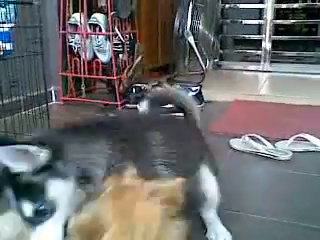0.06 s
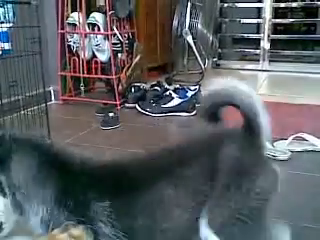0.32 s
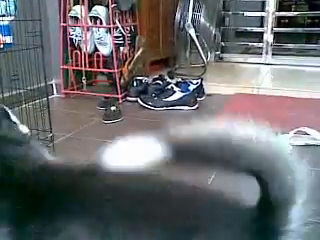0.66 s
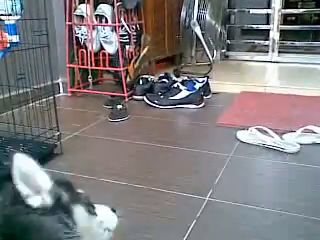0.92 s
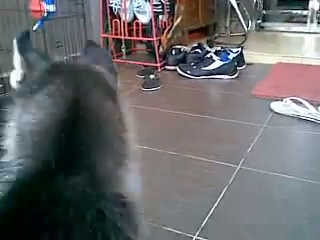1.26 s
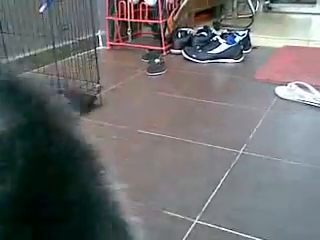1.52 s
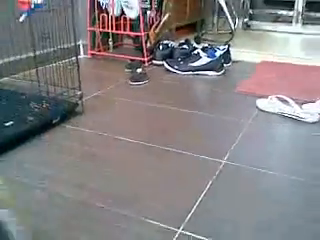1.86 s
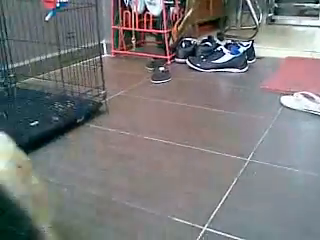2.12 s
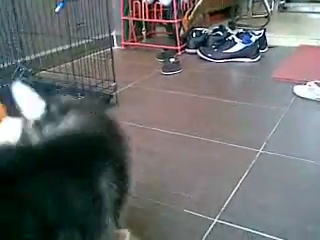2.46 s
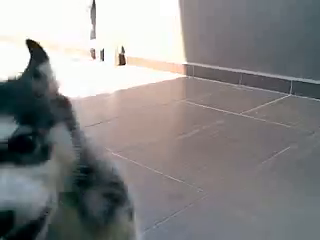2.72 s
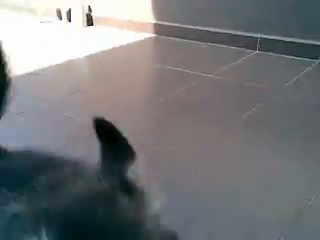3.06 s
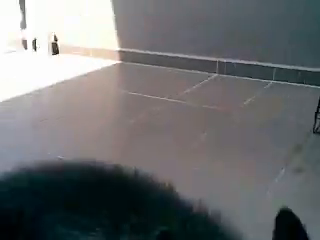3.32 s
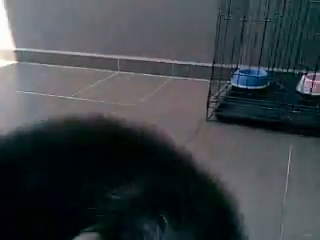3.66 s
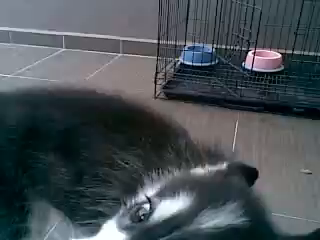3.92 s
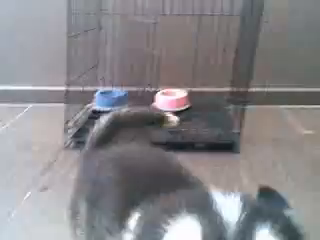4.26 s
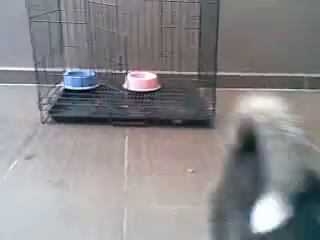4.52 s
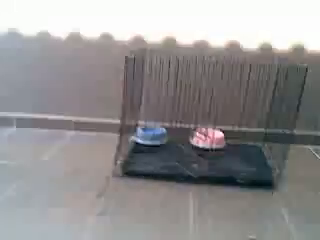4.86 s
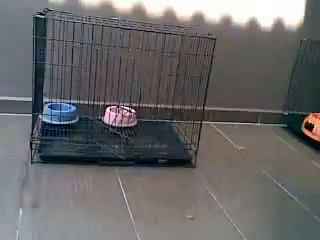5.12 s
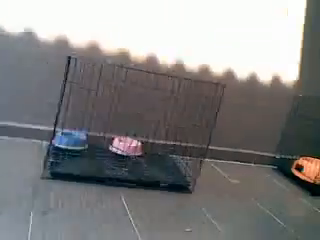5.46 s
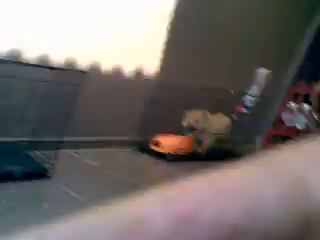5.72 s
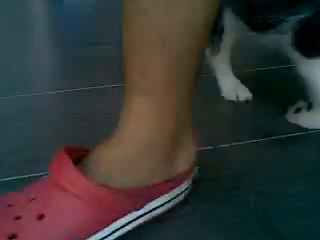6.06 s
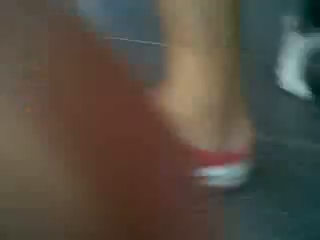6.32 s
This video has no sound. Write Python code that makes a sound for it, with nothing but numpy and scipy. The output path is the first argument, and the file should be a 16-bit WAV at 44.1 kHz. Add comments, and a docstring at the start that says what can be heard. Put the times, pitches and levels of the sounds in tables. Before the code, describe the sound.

Puppies rub, scrape and bump against the microphone, with sharp claw ticks over a faint, distant engine hum.

```python
"""Puppies against the camera

Puppies scuffle on a porch's tile floor, right against a hand-held camera: fur rubs and scrapes over
the case, noses and paws bump it, claws tick, and one pup sniffs and faintly whines. Near the middle
the sound drops out briefly and returns with a thin metallic ring. From there a far engine hums and
slowly speeds up over the low noise of the porch."""
import sys
import numpy as np
from scipy import signal
from scipy.fft import rfft, irfft, next_fast_len
from scipy.io import wavfile
from scipy.ndimage import uniform_filter1d, map_coordinates

SR = 44100
rng = np.random.default_rng(int(sys.argv[2]) if len(sys.argv) > 2 else 0)


def waveform_to_disk(signal):
    """Save audio, clipped to [-1, 1], as 16-bit WAV at the path in sys.argv[1]."""
    frames = np.transpose(np.atleast_2d(signal))
    scaled = np.clip(frames, -1, 1) * 32767
    samples = np.round(scaled).astype(np.int16)
    wavfile.write(sys.argv[1], SR, samples)


N = 282221
TIME = np.arange(N) / SR


def amp(db):
    """Decibels to gain."""
    return 10 ** (np.asarray(db) / 20)


def unit(x):
    """x at rms 1."""
    return x / np.sqrt(np.mean(x ** 2) + 1e-20)


def curves(rows):
    """One value per sample for each column after the time."""
    times, *columns = np.transpose(rows)
    return [np.interp(TIME, times, column) for column in columns]


def wobble(rate):
    """A smooth random curve, rate knots a second."""
    return map_coordinates(rng.standard_normal(int(N * rate / SR) + 4), [TIME * rate])


def filtered(x, response):
    """x through a complex frequency response."""
    size = next_fast_len(len(x) + 8192)
    return irfft(rfft(x, size) * response(np.fft.rfftfreq(size, 1 / SR)), size)[:len(x)]


def coloured(x, points):
    """x shaped by (Hz, dB) points joined on a log axis."""
    hz, db = np.transpose(points)
    return filtered(x, lambda f: amp(np.interp(np.log(f + 1), np.log(hz + 1), db)))


def resonance(f, centre, width):
    """Response of one damped mode."""
    return 1j * f * width / (centre ** 2 - f ** 2 + 1j * f * width)


def band(x, centre, width):
    """x passed twice through one damped mode."""
    return filtered(x, lambda f: resonance(f, centre, width) ** 2)


def add(track, s, x):
    """Mix x into the track from time s on."""
    start = max(round(s * SR), 0)
    track[start:start + len(x)] += x[:max(N - start, 0)]


def stroke(t, half):
    """Strength of a stroke that swells and fades around t = 0."""
    return 1 / np.cosh(np.clip(t / half, -20, 20)) ** 2


# The open air on the porch. Each row: frequency in Hz, spectral density in dB.
PORCH_SPECTRUM = [(10, -30), (25, -9), (40, -2), (62, 0), (100, -5), (150, -3), (250, -11), (400, -13),
                  (800, -18), (1600, -28.5), (2200, -29), (3200, -34.5), (6300, -40.5), (9500, -48),
                  (10400, -62)]
# Its rise and fall. Each row: time in seconds, level in dB.
PORCH_LOUDNESS = [(0, -43.5), (1.5, -43.5), (2.0, -47), (2.55, -46.5), (2.7, -43.5), (3.9, -46), (4.6, -40),
                  (5.4, -40.5), (5.9, -46.5)]


def porch():
    """Low outdoor noise all around the microphone, drifting a little."""
    level_db, = curves(PORCH_LOUDNESS)
    air = unit(coloured(rng.standard_normal(N), PORCH_SPECTRUM))
    return amp(level_db + 0.44 * wobble(5.5)) * air


def friction(rate, spread_db, smooth):
    """Hairs catch and slip: tiny impulses of uneven size, rate a second, on an even hiss."""
    slips = (rng.random(N) < rate / SR) * rng.choice([-1, 1], N)
    sizes = amp(spread_db * np.minimum(rng.standard_normal(N), 2))
    return unit(unit(slips * sizes) + smooth * rng.standard_normal(N))


def patchy(x, depth_db=2.5):
    """As the contact wanders, resonances come and go: patches a few hundred Hz wide, some 20 ms long."""
    spectra = signal.stft(x, nperseg=512)[2]
    patches = uniform_filter1d(rng.standard_normal(spectra.shape), size=5, axis=0)
    patches = uniform_filter1d(patches, size=4, axis=1)
    return unit(signal.istft(spectra * amp(depth_db * unit(patches)), nperseg=512)[1][:N])


def snags(count=420, centre_hz=1700, life_s=0.002):
    """Tufts snag and let go: tiny separate scrapes, each with its own pitch and size."""
    out, t = np.zeros(N), np.arange(SR // 64) / SR
    for s in rng.uniform(0, N / SR, count):
        hz = centre_hz * np.exp(0.55 * rng.standard_normal())
        burst = rng.standard_normal(len(t)) * t * np.exp(-t / life_s)
        add(out, s, amp(rng.uniform(-3, 3)) * unit(band(burst, hz, hz / 2)))
    return unit(out)


# Rubbing on the case: low rumble and hiss, with two narrow treble gaps that are not the fur's.
# Each row: frequency in Hz, spectral density in dB.
RUMBLE_SPECTRUM = [(120, 3), (220, 4.5), (380, 7.5), (560, 1.5), (900, 2), (1300, -4), (1800, -16.5),
                   (3000, -31), (5000, -115)]
HISS_SPECTRUM = [(900, 5.5), (1600, 5), (3400, 1), (4500, 2), (5500, -6), (6700, -1.5), (7400, -23),
                 (8400, -11.5), (9500, -14.5), (10500, -63.5)]
# A coat drags slowly past, right at the microphone.
# Each row: middle in seconds, pressure in dB, half length in seconds, hiss in dB.
COAT_DRAGS = [(0.18, -50, 0.21, -59), (0.457, -48, 0.11, -58), (1.1, -46, 0.11, -62),
              (1.39, -42, 0.042, -49.5), (1.503, -73, 0.077, -45), (2.168, -50.5, .08, -63.5),
              (2.73, -46, 0.049, -51), (2.894, -51.5, 0.072, -49), (3.366, -46.5, 0.18, -61.5),
              (3.614, -44.5, 0.083, -57.5), (3.827, -40, 0.08, -49), (3.937, -38, 0.058, -45),
              (4.069, -37.5, 0.058, -46.5), (4.208, -39, 0.058, -40.5), (4.518, -44, 0.12, -58),
              (4.62, -67, 0.016, -45.5), (4.77, -38, 0.039, -45.5), (4.986, -55, 0.031, -39),
              (5.128, -38.5, 0.032, -40.5), (5.543, -60, 0.042, -40.5), (5.908, -48.5, 0.18, -80),
              (6.218, -55.5, 0.11, -49)]


def rubbing(body_uneven_db=1.6, hiss_uneven_db=0.4, snag_db=-5):
    """Coats drag on the case: coarse slips rumble, fine ones hiss, under one grip; snags crackle."""
    grip = wobble(70)
    coarse = patchy(friction(rate=600, spread_db=3, smooth=0.7))
    fine = patchy(friction(rate=1000, spread_db=3, smooth=0.7))
    body = amp(body_uneven_db * grip) * unit(coloured(coarse, RUMBLE_SPECTRUM))
    hiss = amp(hiss_uneven_db * grip) * unit(coloured(fine, HISS_SPECTRUM))
    pressure, slide = np.zeros(N), np.zeros(N)
    for s, pressure_db, half, hiss_db in COAT_DRAGS:
        swell = stroke(TIME - s, half)
        pressure += amp(pressure_db) * swell
        slide += amp(hiss_db) * swell
    return pressure * body + slide * (hiss + amp(snag_db) * snags())


# Noses and paws bump the case that holds the microphone.
# Each row: start in seconds, peak in dB, contact time in ms, ring of the struck spot in Hz.
CASE_BUMPS = [(0.022, -26.5, 0.72, 710), (0.04, -28.5, 0.8, 650), (0.057, -30.5, 0.74, 800),
              (0.137, -28.5, 0.94, 800), (0.171, -29.5, 1.4, 850), (0.386, -29.5, 0.55, 750),
              (0.836, -33, 0.24, 700), (1.0405, -29, 0.7, 845), (1.188, -28, 0.88, 810),
              (1.2004, -23, 0.85, 680), (1.2159, -17, 0.73, 696), (1.2305, -26, 0.5, 650),
              (1.26, -20.5, 0.69, 687), (1.3367, -27, 0.59, 930), (1.3686, -23, 1.1, 800),
              (1.397, -25, 0.55, 850), (1.405, -26, 0.54, 950), (1.448, -26.5, 0.61, 754),
              (1.7016, -19.5, 0.6, 330), (1.706, -12, 2.2, 130), (1.7252, -7, 0.37, 706),
              (1.7268, -5, 1.16, 380), (1.8838, -2, 1.03, 350), (2.765, -28.5, 0.99, 750),
              (3.928, -24, 0.53, 850), (4.537, -18, 0.52, 660), (4.687, -26, 0.34, 710),
              (5.037, -22.5, 0.68, 610), (5.1826, -7.5, 0.61, 750), (5.1838, -11, 2.2, 130),
              (5.2676, -17, 0.45, 795), (5.308, -12.5, 1, 500), (5.4164, -6, 0.87, 410),
              (5.434, -4, 1.08, 281), (5.4368, -10.5, 1.22, 750), (5.5386, -10.5, 0.27, 1180),
              (5.808, -15, 0.41, 776), (5.913, -26, 0.56, 700), (6.2565, -18, 1.84, 260)]


def knocks(grit=0.021, leak_hz=70, panel_hz=910, shell_hz=2700):
    """One short push a bump: the struck spot is heavily damped; panel and shell ring a few cycles."""
    def case(f, spot_hz):
        push = 0.38 * 1j * f / (leak_hz + 1j * f)
        modes = resonance(f, panel_hz, width=230) + resonance(f, shell_hz, width=450)
        return push + resonance(f, spot_hz, width=560) + amp(-4) * modes

    out, ms = np.zeros(N), np.arange(SR // 16) * 1000 / SR
    for s, db, contact_ms, hz in CASE_BUMPS:
        force = np.sin(np.pi * np.minimum(ms / contact_ms, 1)) ** 2
        force *= 1 + grit * rng.standard_normal(len(ms))  # rough surfaces crunch as they meet
        bump = filtered(force, lambda f: case(f, hz))
        add(out, s, amp(db) * bump / np.abs(bump).max())
    return out


def walls(x, t60=0.074, dull_hz=4000):
    """A short, duller answer from the tiles and walls around the camera."""
    t = np.arange(SR // 2) / SR
    tail = rng.standard_normal(len(t)) * amp(-60 * t / t60)
    reflected = signal.fftconvolve(x, tail / np.linalg.norm(tail))[:N]
    return filtered(reflected, lambda f: 1 / (1 + 1j * f / dull_hz))


def rasp(rate=330, depth_db=6):
    """Stick and slip: the grip lets go at an uneven rate, and each slip dies away until the next."""
    cycle = np.cumsum(rate * amp(3 * wobble(250))) / SR % 1
    return unit(amp(-depth_db * cycle))


# A nose close to the microphone. Each row: middle in seconds, level in dB, half length in seconds.
CLOSE_SNIFFS = [(0.283, -47.5, 0.062), (1.229, -44.5, 0.03), (1.294, -55, 0.0397)]
# Its whistles. Each row: pitch in Hz, relative level in dB.
NOSTRIL_WHISTLES = [(3300, 1), (4000, -5)]


def sniffs(flutter=0.033, drift=0.018, sag=0.06):
    """A puppy draws air through narrow nostrils that half whistle, sagging in pitch as the flow ends."""
    flow = sum(amp(db) * stroke(TIME - s, half) for s, db, half in CLOSE_SNIFFS)
    hiss = unit(band(rng.standard_normal(N), centre=3350, width=1200))
    bend = 1 + drift * wobble(35) - sag * (1 - flow / flow.max()) ** 4
    whistle = np.zeros(N)
    for hz, db in NOSTRIL_WHISTLES:
        pitch = hz * bend * (1 + flutter * wobble(500))
        whistle += amp(db + 3.3 * wobble(110)) * np.sin(2 * np.pi * np.cumsum(pitch) / SR)
    return unit((hiss + unit(whistle)) * rasp()) * flow


# Gritty scraping noise, duller toward the top, with a narrow treble gap that is not the scrape's.
# Each row: frequency in Hz, spectral density in dB.
GRIT_SPECTRUM = [(100, 23.5), (400, 21), (800, 16.5), (1400, 11), (2500, 8), (4000, 4.5), (5500, 3),
                 (6800, 3), (7700, -9), (9000, -4), (10200, -42.5)]
# Quick scrapes over the case, at the microphone. Each row: peak time in seconds, level in dB,
# rise and fall in seconds, brightest band in Hz, linear gain of the ring there.
CASE_SCRAPES = [(0.374, -45, 0.008, 0.016, 1500, 0), (0.51, -45, 0.036, 0.023, 1990, 0.5),
                (0.996, -47, 0.019, .02, 1620, .5), (1.192, -45.5, 0.024, 0.0073, 2600, 8),
                (1.203, -34.5, 0.025, 0.015, 750, 4), (1.378, -39.5, 0.013, 0.043, 1900, -1),
                (1.476, -47, 0.01, 0.011, 1140, 9), (1.57, -46, 0.025, 0.016, 1560, -0.5),
                (1.724, -23.5, 0.0028, 0.0029, 3300, 0.5), (1.926, -50, 0.011, 0.01, 6700, 1.5),
                (2.029, -45, 0.0065, 0.054, 1850, 3.5), (2.29, -62, 0.15, 0.12, 2110, 9),
                (2.552, -55, 0.027, 0.025, 3560, -0.5), (2.95, -49.5, 0.017, .024, 1810, 0.5),
                (3.162, -47.5, 0.026, 0.017, 1600, -0.5), (3.22, -49.5, 0.014, 0.013, 2100, 0),
                (3.29, -48.5, 0.018, 0.053, 2400, 0), (3.438, -40, 0.038, 0.026, 1280, 0),
                (3.645, -51, 0.053, 0.051, 3030, 12), (3.93, -43.5, 0.1, 0.052, 2920, 10),
                (4.29, -38.5, 0.028, 0.015, 1500, 0.5), (4.366, -31, 0.0043, 0.025, 3020, 1.5),
                (4.711, -35.5, 0.012, 0.021, 4550, 0), (4.83, -37, 0.032, 0.037, 2570, 5),
                (4.829, -26, 0.019, 0.018, 6160, 1), (4.924, -30, 0.013, 0.0089, 3640, 0),
                (5.064, -28.5, 0.016, 0.036, 4700, 0), (5.196, -30, 0.022, 0.031, 1080, 2),
                (5.21, -36, 0.028, 0.02, 2360, 13), (5.324, -17, 0.018, 0.016, 2930, 2.9),
                (5.335, -24, 0.024, 0.022, 6460, 12), (5.427, -27, 0.025, 0.02, 1040, 1.3),
                (5.448, -37.5, 0.043, 0.047, 6600, -0.1), (5.659, -41, 0.052, 0.048, 4830, -0.5),
                (5.863, -42.5, 0.02, 0.02, 3970, 0), (5.944, -46, 0.02, 0.018, 2760, 0.2),
                (6.372, -39, 0.021, 0.026, 2600, -0.4)]


def scrapes(breadth=1.64, ring_breadth=0.28, ragged_db=1.92, edge=1.8, skirt=0.095):
    """Juddering strokes bite and let go; each scrape has its own bright band, which may ring."""
    out = np.zeros(N)
    slips = friction(rate=4000, spread_db=1.0, smooth=0.49) * rasp() * amp(ragged_db * wobble(230))
    grit = coloured(patchy(slips), GRIT_SPECTRUM)
    for s, db, rise, fall, hz, ring in CASE_SCRAPES:
        near = slice(max(round((s - 0.3) * SR), 0), round((s + 0.4) * SR))
        t = TIME[near] - s
        half = np.where(t < 0, rise, fall)
        bite = (1 - skirt) * np.exp(-np.abs(t / half) ** edge) + skirt * stroke(t, 2 * half)
        response = lambda f: resonance(f, hz, breadth * hz) + ring * resonance(f, hz, ring_breadth * hz)
        scrape = unit(bite * filtered(grit[near], response))
        out[near] += amp(db) * np.sqrt(np.mean(bite ** 2)) * scrape
    return out


# Claws at close range. Each row: start in seconds, peak in dB, ring in Hz.
CLAW_TICKS = [(0.386, -29, 7300), (0.422, -28, 7250), (0.836, -33.5, 2430), (1.218, -33, 1870),
              (1.259, -35, 2520), (1.336, -37, 2400), (1.37, -38, 3200), (1.397, -35, 2600),
              (1.7215, -6.5, 5950), (1.7503, -26, 2900), (1.884, -28, 2700), (2.714, -32.5, 6260),
              (4.363, -23, 7250), (4.3747, -22, 2500), (4.536, -25, 4340), (4.686, -32, 2970),
              (4.914, -38, 3460), (5.267, -24.5, 3960), (5.308, -10, 5000), (5.317, -9.5, 3200),
              (5.416, -19.5, 4200), (5.538, -15.5, 4160), (5.807, -23, 3770)]


def claws(cycles=26, breadth=0.59, tail_db=-24.5, tail_t60=0.011):
    """A hard claw makes a bright crack, gone in a few milliseconds; the higher its pitch, the sooner."""
    out, t = np.zeros(N), np.arange(SR // 25) / SR
    for s, db, hz in CLAW_TICKS:
        decay = amp(-60 * t * hz / cycles) + amp(tail_db - 60 * t / tail_t60)
        tick = band(rng.standard_normal(len(t)) * decay, hz, breadth * hz)
        add(out, s, amp(db) * tick / np.abs(tick).max())
    return out


# One faint whine beside the camera. Each row: time in seconds, pitch in Hz, level in dB.
WHINE_CONTOUR = [(1.24, 934, -76), (1.28, 938, -52), (1.325, 984, -47), (1.36, 1063, -55),
                 (1.42, 1100, -46)]


def whine(middle_s=1.325, half_s=0.1):
    """A puppy's thin voice: one rising, wavering tone."""
    pitch, level_db = curves(WHINE_CONTOUR)
    phase = 2 * np.pi * np.cumsum(pitch * (1 + 0.0089 * wobble(87.8))) / SR
    sounding = np.abs(TIME - middle_s) < half_s
    return sounding * amp(level_db + 3.1 * wobble(61.4)) * np.sin(phase)


# A puppy leans into the hand-held camera. Each row: start in seconds, peak in dB, sway in Hz.
BODY_SHOVES = [(1.707, -23, 45), (1.886, -22.5, 56.7), (2.707, -30.5, 49.5), (4.357, -26, 74),
               (5.186, -17, 48.6), (5.424, -18.5, 96), (5.522, -23, 64.6), (5.654, -26.5, 45)]


def shoves(t60=0.062, rise_s=0.0032):
    """A soft body sways the camera for a cycle or two."""
    out, t = np.zeros(N), np.arange(SR // 5) / SR
    for s, db, hz in BODY_SHOVES:
        sway = np.sin(2 * np.pi * hz * t) * amp(-60 * t / t60) * (1 - np.exp(-t / rise_s))
        add(out, s, amp(db) * sway / np.abs(sway).max())
    return out


# A gap near the middle. Each row: time in seconds, gain in dB.
DROPOUT_GAIN = [(2.562, 0), (2.585, -32), (2.692, -31), (2.701, 0)]


def dropout(x):
    """Everything, near and far, falls away briefly."""
    gain_db, = curves(DROPOUT_GAIN)
    return x * amp(gain_db)


# An engine far from the porch. Each row: time in seconds, speed in cycles a second.
ENGINE_SPEED = [(2.7, 27.1), (3.2, 28.8), (3.45, 29.3), (3.72, 28.9), (4.3, 33.5), (4.7, 35.5),
                (5.45, 37.1), (5.95, 37.5), (6.4, 38.3)]
# Its exhaust drone. Each row: multiple of the speed, relative level in dB.
EXHAUST_ORDERS = [(1, -14), (3, -12), (4, -17), (5, 0), (6, -9), (9, -21)]
# What reaches the microphone. Each row: time in seconds, exhaust drone in dB, firing boom in dB.
ENGINE_LOUDNESS = [(2.7, -39, -32.5), (3.0, -37.5, -38.5), (3.13, -39, -47.5), (3.25, -44.5, -38),
                   (3.42, -43, -42.5), (3.62, -32.5, -40.5), (3.8, -41.5, -41), (4.03, -35.5, -56),
                   (4.2, -41.5, -40.5), (4.45, -43.5, -38.5), (4.95, -41.5, -43.5), (5.55, -53, -48.5),
                   (6.1, -43.5, -45.5)]


def engine(waver_db=1.3):
    """Only the low orders of the far engine carry; each wavers on its way."""
    speed, = curves(ENGINE_SPEED)
    drone_db, boom_db = curves(ENGINE_LOUDNESS)
    phase = 2 * np.pi * np.cumsum(speed * (1 + 0.0039 * wobble(12))) / SR

    def tone(order, db):
        rms = amp(db + waver_db * wobble(20))
        return np.sqrt(2) * rms * np.sin(order * phase + 2 * np.pi * rng.random())

    boom = tone(order=2, db=boom_db)
    drone = sum(tone(order, drone_db + db) for order, db in EXHAUST_ORDERS)
    return (boom + drone) * (TIME > ENGINE_SPEED[0][0])


def wire(start_s=2.703, pitch_hz=3040, width_hz=220, level_db=-57.5, t60=0.81):
    """A thin, blurred ring, like a brushed cage wire, that dies away."""
    age = np.maximum(TIME - start_s, 0)
    ring = unit(band(rng.standard_normal(N), pitch_hz, width_hz))
    return (age > 0) * amp(level_db - 60 * age / t60) * ring


def scene():
    """From among the puppies: nearly dry contacts up close, the porch and the engine behind."""
    contacts = knocks() + scrapes() + claws()
    close = rubbing() + contacts + amp(-14) * walls(contacts) + sniffs() + whine() + shoves() + wire()
    dip = amp(-10 * stroke(TIME - 5.755, half=0.031))  # the background dips briefly near the end
    background = (porch() + engine()) * dip
    return dropout(close + background)[None]


def record(dry, ceiling=0.62, top_hz=10487):
    """The camera rounds off the highest peaks and keeps nothing above its band limit."""
    rounded = dry[0] / (1 + (dry[0] / ceiling) ** 8) ** (1 / 8)
    return filtered(rounded, lambda f: 1 / np.sqrt(1 + (f / top_hz) ** 200))[None]


dry = scene()
out = record(dry)
waveform_to_disk(out)
```